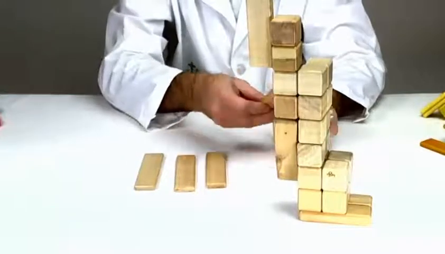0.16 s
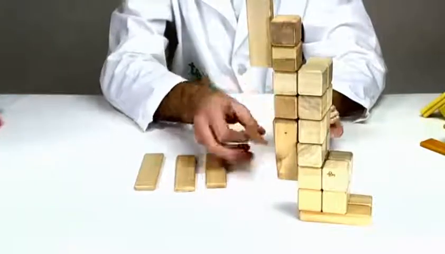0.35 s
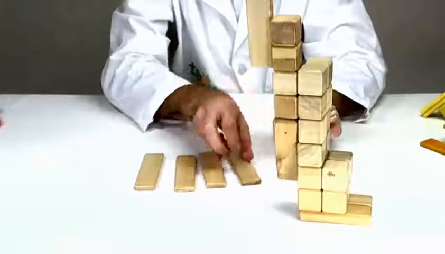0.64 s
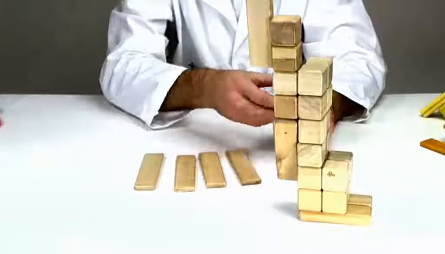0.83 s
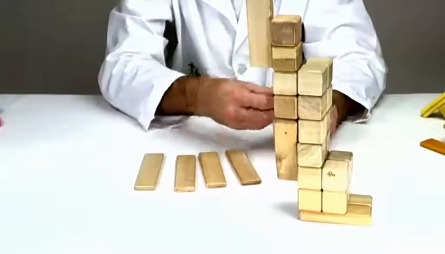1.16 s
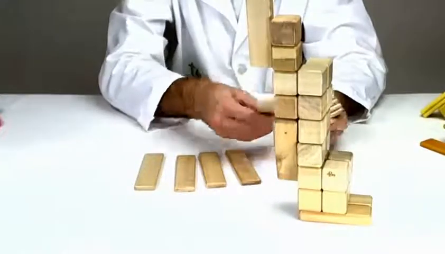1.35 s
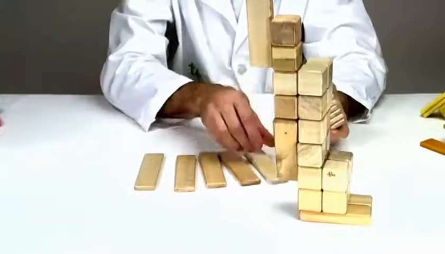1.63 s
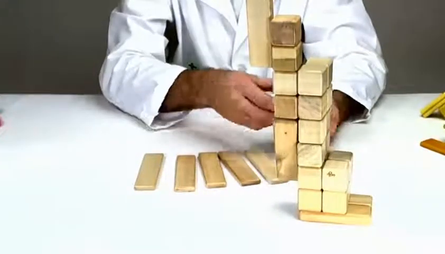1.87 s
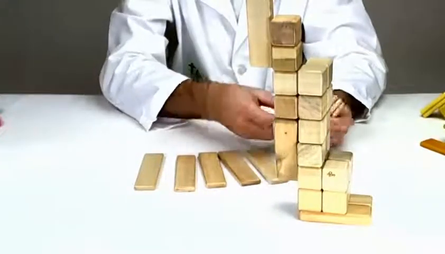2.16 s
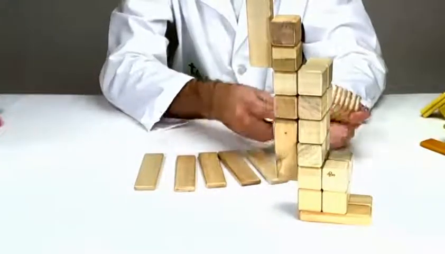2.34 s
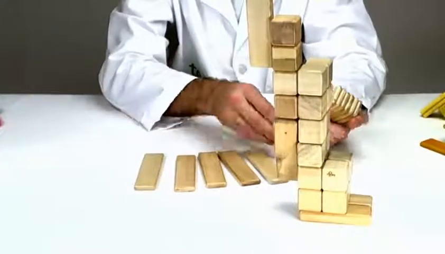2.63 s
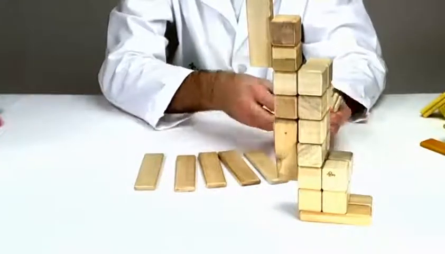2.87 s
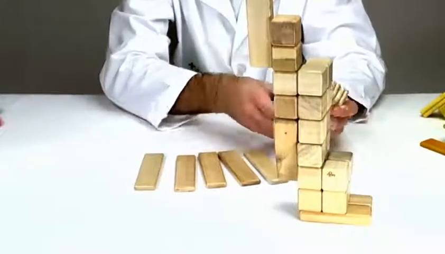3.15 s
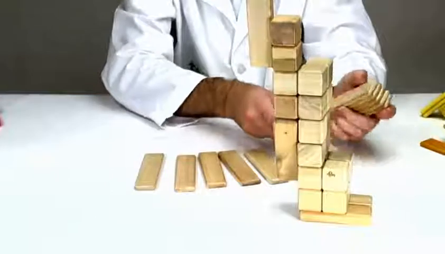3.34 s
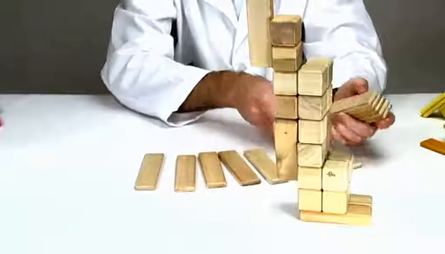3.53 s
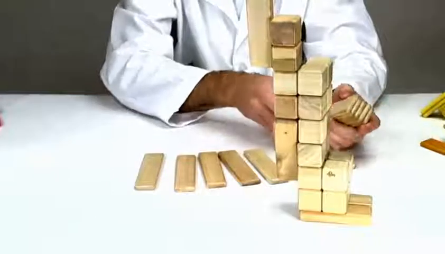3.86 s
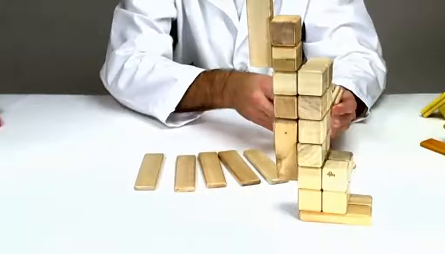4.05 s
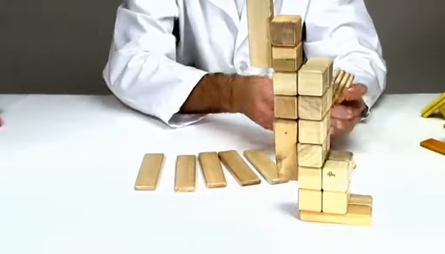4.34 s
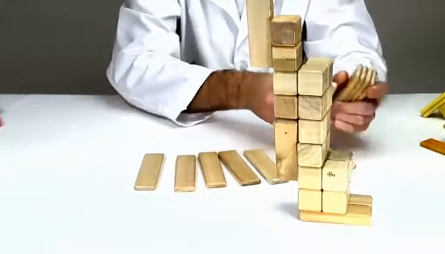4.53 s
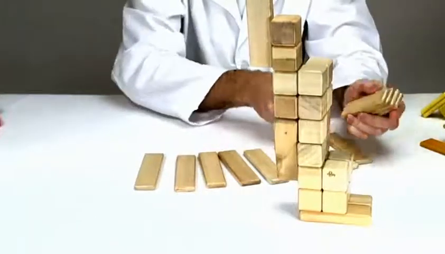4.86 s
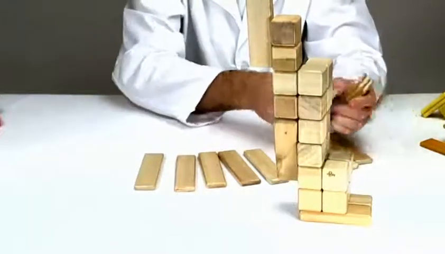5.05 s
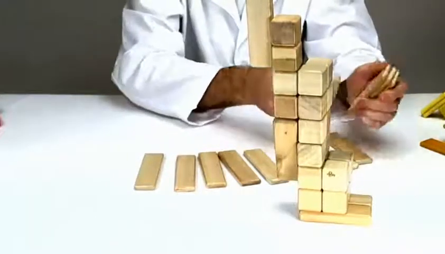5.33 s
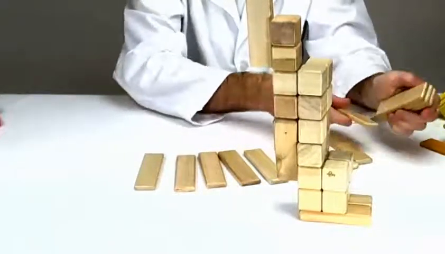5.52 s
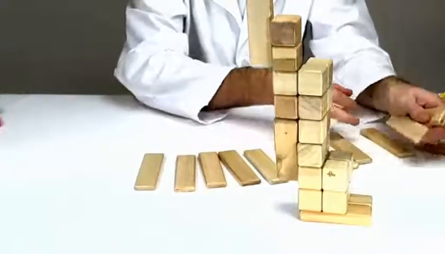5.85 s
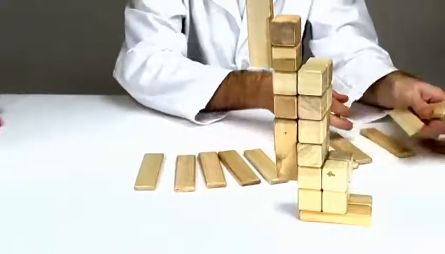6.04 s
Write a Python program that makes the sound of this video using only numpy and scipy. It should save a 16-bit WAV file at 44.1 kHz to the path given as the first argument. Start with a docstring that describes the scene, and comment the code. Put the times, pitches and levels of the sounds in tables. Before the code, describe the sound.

Close in a fairly live room, thin wooden planks are handled over a table. Dull thuds and faint finger rubbing come first, then a stronger knock near two seconds. Planks click and slip off the stack, one very sharp clack comes around four and a half seconds, quick thuds follow, and two loud clacks end it. Low arm rumble and quiet hiss lie beneath.

```python
"""Thin wooden planks land, and a hand or other soft contact thumps, on a table in a fairly live room:
damped modes of the tabletop thud and boom. Planks slid off a hand-held stack clack together (damped
plank modes and a noisy crack), or scrape (friction slips through resonances) and ring as beating noise.
Arms bump the table in low swells and rumble on it; fingers rub on wood in grainy noise over a quiet hiss.
The wood sounds also get dull echoes from near walls and a diffuse room tail; the recorder cuts the top."""
import sys
import numpy as np
from scipy import signal
from scipy.fft import rfft, irfft
from scipy.io import wavfile
from scipy.ndimage import uniform_filter1d

SR = 44100
rng = np.random.default_rng(int(sys.argv[2]) if len(sys.argv) > 2 else 0)


def file_out(sig):
    """Save sig as 16-bit WAV at sys.argv[1]."""
    # one column per channel
    cols = np.atleast_2d(sig).T
    # limit, then scale
    lim = np.clip(cols, -1, 1)
    pcm = np.round(lim * 32767).astype(np.int16)
    wavfile.write(sys.argv[1], SR, pcm)


N = 272979
TIME = np.arange(N) / SR  # s


def from_db(db):
    """Decibels to gain."""
    return 10 ** (np.asarray(db) / 20)


def rms_one(x):
    """Scale to unit power."""
    return x / np.sqrt(np.mean(x ** 2) + 1e-20)


def at_hz(points, hz, axis=1):
    """Read a column of a table on a log-frequency axis."""
    table = np.array(points)
    return np.interp(np.log(np.maximum(hz, 1)), np.log(table[:, 0]), table[:, axis])


def add(track, s, sound):
    """Mix a sound into a track at a time."""
    start = max(round(s * SR), 0)
    track[start:start + len(sound)] += sound[:max(N - start, 0)]


def soften(x, hz, order=2):
    """Low-pass: a longer contact leaves out the high frequencies."""
    return signal.sosfilt(signal.butter(order, min(hz, SR / 2 - 1000), fs=SR, output="sos"), x)


def ring(modes, ratio=1, scatter_db=0):
    """Decaying sines of alternating sign; each point of contact weights them differently."""
    t = TIME[:SR // 2]
    strengths_db = rng.normal(0, 1, len(modes)) * scatter_db
    out = np.zeros(len(t))
    for k, (hz, db, t60) in enumerate(modes):
        decay = from_db(db + strengths_db[k] - 60 * t / t60)
        out += (-1) ** k * decay * np.sin(2 * np.pi * hz * ratio * t)
    return out


def resonate(x, hz, width):
    """A two-pole resonance with unit gain on top."""
    r = np.exp(-np.pi * width / SR)
    zeros = np.array([1, 0, -1]) * (1 - r * r) / 2
    poles = [1, -2 * r * np.cos(2 * np.pi * hz / SR), r * r]
    return signal.lfilter(zeros, poles, x)


def coloured(x, spectrum):
    """Give a noise a spectrum; rms 1."""
    bins_hz = np.arange(N // 2 + 1) * SR / N
    return rms_one(irfft(rfft(x) * from_db(at_hz(spectrum, bins_hz)), N))


def slips(per_s, spread_db, size):
    """Friction: tiny slips of uneven strength at random moments; rms 1."""
    strength = from_db(spread_db * np.minimum(rng.exponential(1, size), 4))
    happens = rng.random(size) < per_s / SR
    return rms_one(happens * strength * rng.choice([-1, 1], size))


def swell(start, end, rise_s, release_s):
    """Envelope that rises to 1 by the start, holds to the end and dies away exponentially."""
    return np.exp(np.minimum(TIME - start, 0) / rise_s - np.maximum(TIME - end, 0) / release_s)


def hiss(level_db=-56.5):
    """Steady noise with a fixed spectrum under the whole scene."""
    # hiss spectrum: hz, level_db (per Hz, relative)
    hiss_spectrum = [(12, -41), (20, 6), (43, -2), (153, -2.5), (261, -10), (615, -12), (666, -11.5),
                     (2000, -22), (3230, -24.5), (5100, -23.5), (8030, -31.5), (10200, -26), (12000, -46),
                     (15600, -73), (22000, -120)]
    return from_db(level_db) * coloured(rng.standard_normal(N), hiss_spectrum)


def arm_rumble(rise_s=0.16, settle_s=0.32):
    """Low noise swells as an arm shifts its weight on the table."""
    # shifts: peak_s, rumble_db
    shifts = [(.15, -60.5), (.64, -51), (1.219, -49.5), (2.198, -48), (3.13, -44.5), (4.55, -43.5)]
    # rumble spectrum: hz, level_db (per Hz, relative)
    rumble_spectrum = [(12, -39), (20, 1.5), (59, -1), (118, -7), (252, -16), (292, -18), (500, -33),
                       (650, -23.5), (1100, -120)]
    weight = sum(from_db(db) * swell(s, s, rise_s, settle_s) for s, db in shifts)
    return weight * coloured(rng.standard_normal(N), rumble_spectrum)


def pull_effort(rise_s=0.043, release_s=0.056, growth_db=5.5):
    """Fingers draw planks along the stack: each pull fades in, grows and dies away."""
    # pulls: end_s, length_s, effort_db (one and a half growths above the pull's starting level)
    pulls = [(0.387, 0.41, -67), (0.711, .22, -59.5), (1.948, 0.43, -59.5), (2.838, 0.39, -64),
             (4.036, 0.39, -60.5), (4.616, 0.2, -56.5), (5.16, 0.17, -60), (6.19, 0.24, -52)]
    effort = np.zeros(N)
    for end, length_s, db in pulls:
        progress = np.clip((TIME - end) / length_s + 1, 0, 1)
        growth = from_db(db + growth_db * (progress - 1.5))
        effort += growth * swell(end - length_s, end, rise_s, release_s)
    return effort


def rubbing(catches_per_s=35, uneven_db=2.5, hold_db=-71):
    """Fingers rub on wood by friction slips; in a pull the grain of one plank sings on the next."""
    # rubbing spectrum: hz, level_db (per Hz, relative)
    rub_spectrum = [(240, -78), (400, -5), (863, -6), (953, -3.5), (1080, -5.5), (1640, -11.5), (3330, -12),
                    (5560, -6), (6790, -14.5), (10600, -14), (12000, -16), (15600, -58), (22000, -120)]
    effort = pull_effort()
    grip = from_db(uneven_db * rms_one(soften(rng.standard_normal(N), catches_per_s)))
    # fingers merely holding the stack rub at hold_db
    rub = (from_db(hold_db) + effort) * coloured(slips(per_s=4000, spread_db=1.5, size=N), rub_spectrum)
    grain = rms_one(resonate(slips(per_s=1800, spread_db=2.5, size=N), hz=5000, width=1400))
    return grip * (rub + effort * from_db(-1.5) * grain)


def clack(bright_hz, ratio, crack_db=-13):
    """Hard contact: the plank's modes and a brief crack of the rough surfaces."""
    # modes of planks damped by the hand: hz (before the pitch ratio), level_db, t60_s
    plank_modes = [(1607, -15, 0.014), (2117, -8.5, 0.0062), (2810, -3.5, 0.0047), (3290, -7.5, 0.0073),
                   (4030, -12, 0.0095), (4380, -10, 0.011), (5430, 0.5, 0.0044), (6270, -8.5, 0.017),
                   (8520, -1.5, 0.0018), (10000, -7, 0.0073), (11200, -3, 0.0056)]
    decay = from_db(crack_db - 60 * TIME[:SR // 2] / .02)
    crack = rng.standard_normal(SR // 2) * decay
    return soften(ring(plank_modes, ratio, scatter_db=4.5) + crack, bright_hz, order=1)


def knocks(low_cut_hz=130):
    """Planks land, and a hand or other soft contact thumps, on the tabletop: thud, boom and edge click."""
    # contacts with the tabletop: start_s, thud_db, contact_brightness_hz, pitch_ratio of the spot
    thuds = [(.001, -27.5, 910, 1.05), (0.286, -33, 392, 0.53), (0.648, -28, 260, 0.61),
             (0.9216, -25, 990, 0.93), (.944, -27.5, 848, 1.11), (1.019, -26.5, 1110, 1.12),
             (1.118, -29.5, 199, 0.8), (1.895, -15, 850, 1.053), (1.9764, -22, 910, 1.03),
             (2.2503, -26, 296, 0.84), (2.7984, -23, 620, 1.03), (2.8467, -24, 600, 0.95),
             (2.965, -28.5, 1820, 1.073), (3.81, -26.5, 157, .58), (4.0463, -20.5, 534, 1.01),
             (4.126, -29.5, 746, 0.81), (4.9628, -22, 920, 1.02), (5.0211, -18.5, 1400, 0.87),
             (5.051, -20.5, 800, 0.88), (5.079, -26.5, 1180, 1.147), (6.1073, -27.5, 3000, 2.18),
             (6.154, -36, 3000, 1.5)]
    # heavily damped modes of the tabletop: hz (before the pitch ratio), level_db, t60_s
    table_modes = [(209, -12, 0.027), (309.4, -8.5, 0.034), (418.6, -5.5, 0.026), (571, -2.5, .022),
                   (917, -8.5, 0.014), (1153, -12, 0.013), (1730, -16, 0.0064)]
    # the whole table booms lower and longer: hz, level_db, t60_s
    boom_modes = [(147.7, 5.5, 0.05)]
    out = np.zeros(N)
    for s, thud_db, bright_hz, ratio in thuds:
        # the boom follows the thud only in part and fades at stiffer spots, 9 dB an octave
        boom_db = -29.5 + 0.55 * thud_db - 9 * np.log2(ratio)
        # the edge clicks more in a hard contact, 6.5 dB an octave about the usual 800 Hz
        click_db = thud_db - 20 + 6.5 * np.log2(bright_hz / 800)
        add(out, s, from_db(thud_db) * soften(ring(table_modes, ratio, scatter_db=3), bright_hz))
        add(out, s, from_db(boom_db) * soften(ring(boom_modes), bright_hz))
        add(out, s, from_db(click_db) * clack(bright_hz=9750, ratio=1.07))
    # the deepest bass is left out of the knocks
    return signal.sosfilt(signal.butter(2, low_cut_hz, "high", fs=SR, output="sos"), out)


def clacks(pitch_ratio=0.93, rebound_s=0.0035, rebound_db=-7.5, rebound_hz=2800):
    """Planks strike one another; their faces quickly meet a second time, more softly."""
    # wood on wood: start_s, level_db, contact_brightness_hz
    strikes = [(0.491, -42.5, 6000), (.637, -34.5, 3000), (2.3425, -38, 4050), (2.5124, -22.5, 4000),
               (2.856, -34, 2000), (3.3593, -40.5, 3500), (3.4202, -36.5, 3520), (4.435, -14, 7100),
               (5.023, -32.5, 8900), (5.3321, -45.5, 9000), (5.38, -45, 8900), (5.4243, -45, 9000),
               (5.5147, -44, 9100), (5.9296, -30, 8900), (6.1073, -15.5, 3040), (6.154, -10.5, 3100)]
    out = np.zeros(N)
    for s, db, bright_hz in strikes:
        add(out, s, from_db(db) * clack(bright_hz, pitch_ratio))
        add(out, s + rebound_s, from_db(db + rebound_db) * clack(rebound_hz, pitch_ratio))
    return out


def scuffs(relative_width=0.86):
    """Light, grainy friction under a short push; the briefer the push, the denser its slips."""
    # a plank is nudged over the table or stack: peak_s, half_length_s, level_db, centre_hz
    nudges = [(.636, 0.018, -56.5, 2190), (1.011, 0.018, -53, 2300), (1.336, 0.016, -54, 2350),
              (1.558, 0.015, -55, 4180), (1.695, 0.033, -57, 1200), (3.383, 0.027, -58, 2900),
              (3.753, .02, -47.5, 2200), (4.618, 0.0044, -43, 4080), (5.014, 0.004, -46.5, 4600)]
    out, t = np.zeros(N), TIME[:SR] - 1 / 2
    for s, half_s, db, hz in nudges:
        friction = slips(per_s=20 / half_s, spread_db=4.0, size=SR)
        grain = rms_one(resonate(friction, hz, relative_width * hz))
        push = np.exp(-(t / half_s) ** 2)
        add(out, s - 1 / 2, from_db(db) * grain * push)
    return out


def bumps():
    """Soft pushes swell and fade as sines at the low pitches of the table frame."""
    # arms lean on the table and its frame sways: peak_s, half_length_s, level_db, pitch_hz
    pushes = [(1.185, .025, -41, 96), (1.22, .06, -39, 35), (3.165, .035, -42, 68), (3.26, .07, -44, 62),
              (3.825, .018, -41, 93), (4.675, .02, -46, 88)]
    out = np.zeros(N)
    for s, half_s, db, hz in pushes:
        push = np.exp(-((TIME - s) / half_s) ** 2)
        out += from_db(db) * push * np.sin(2 * np.pi * (hz * TIME + rng.random()))
    return out


def stack_ring(hz, t60, level_db=-9):
    """Nearly equal planks ring at slightly different pitches and beat: narrow noise that decays."""
    cluster = resonate(resonate(rng.standard_normal(SR), hz, 260), hz, 260)
    return rms_one(cluster) * from_db(level_db - 60 * TIME[:SR] / t60)


def slides(stop_s=0.0046, pitch_width_hz=600):
    """Friction swells until the plank slips off; once free, its bending modes ring, the second longest."""
    # a plank slips off the stack: release_s, build_up_s, scrape_db, scrape_pitch_hz,
    # ring_db (first mode, before the stack ring's own level), ring_t60_s (second mode)
    releases = [(2.516, 0.0062, -39.5, 2740, -38, 0.48), (4.635, 0.015, -36.5, 4130, -47, 0.32),
                (5.165, 0.011, -43.5, 5880, -50, 0.47), (5.739, 0.0055, -32.5, 4020, -40, 0.37),
                (5.759, 0.014, -35, 3750, -42.5, 0.45)]
    # bending modes of each sliding plank, in turn: first_hz, second_hz, third_hz
    bending_modes = [(1960, 5060, 11000), (2400, 6430, 9900), (2260, 6020, 10100), (2860, 6000, 10200),
                     (2400, 5950, 10100)]
    # bands taken out of each scrape, leaving dips: hz, width_hz, level_db (of the part removed)
    stack_modes = [(1020, 1020, -10.5), (2120, 260, -4), (6340, 1300, -15.5), (9740, 1950, -12.5)]
    mode_db, t60_share = (0, -1, -5), (0.69, 1, 0.57)
    out, t = np.zeros(N), TIME[:SR] - 1 / 2
    for (s, build_s, scrape_db, pitch_hz, ring_db, t60), bending in zip(releases, bending_modes):
        envelope = np.exp(np.minimum(t / build_s, -t / stop_s))
        friction = slips(per_s=2000, spread_db=-1.5, size=SR) * envelope
        scrape = resonate(friction, pitch_hz, pitch_width_hz)
        scrape -= sum(from_db(db) * resonate(friction, hz, width) for hz, width, db in stack_modes)
        loudest = np.sqrt(uniform_filter1d(scrape ** 2, size=384).max())
        add(out, s - 1 / 2, from_db(scrape_db) * scrape / loudest)
        for hz, db, share in zip(bending, mode_db, t60_share):
            add(out, s, from_db(ring_db + db) * stack_ring(hz, t60 * share))
    return out


def echoes(x, wall_hz=900):
    """Near walls throw the low notes back in one piece."""
    # reflections by distance: delay_s, level_db
    reflections = [(.0055, -7), (0.0139, -15.5), (.0215, -25), (0.0356, -18)]
    out, dull = np.zeros(N), soften(x, wall_hz, order=1)
    for delay_s, db in reflections:
        add(out, delay_s, from_db(db) * dull)
    return out


def diffuse(response):
    """Countless overlapping room modes: no single one stands out from its neighbours."""
    spectrum = rfft(response)
    power = np.abs(spectrum) ** 2 + 1e-9
    evenness = uniform_filter1d(power, size=401) / uniform_filter1d(power, size=31)
    return irfft(spectrum * np.sqrt(evenness), len(response))


def room(x, early_db=2, early_t60=0.072):
    """Scattered early reflections, then a tail that dies band by band."""
    # the room: hz, reverberation_db against the direct sound, t60_s
    room_bands = [(115, 4, 0.31), (284, 1.5, 0.48), (595, 1, 0.32), (1500, -2.5, 0.43), (3550, -9.5, 0.25),
                  (9500, -3.5, 0.28)]
    t, response = TIME[:SR], np.zeros(SR)
    edges = np.geomspace(60, 14000, 17)  # Hz
    onset = np.interp(t, [.004, .011, .6, .8], [0, 1, 1, 0])
    for low, high in zip(edges, edges[1:]):
        hz = np.sqrt(low * high)
        band = signal.butter(2, [low, high], "band", fs=SR, output="sos")
        noise = signal.sosfilt(band, rng.standard_normal(SR))
        late = from_db(-60 * t / at_hz(room_bands, hz, axis=2))
        early = from_db(early_db - 60 * t / early_t60)
        tail = noise * onset * (late + early)
        # each band's energy in proportion to its width
        unit = np.sqrt(2 * (high - low) / SR / np.sum(tail ** 2))
        response += from_db(at_hz(room_bands, hz)) * tail * unit
    return signal.fftconvolve(x, onset * diffuse(response))[:N]


def scene():
    """The wood sounds in their room, over handling noise and hiss."""
    wood = knocks() + clacks() + scuffs() + slides()
    handling = arm_rumble() + rubbing() + bumps()
    return (wood + echoes(wood) + room(wood) + handling + hiss())[None]


def record(dry, cutoff_hz=11400):
    """The recorder cuts the top steeply."""
    return signal.sosfilt(signal.butter(24, cutoff_hz, fs=SR, output="sos"), dry)


dry = scene()
out = record(dry)
file_out(out)
```